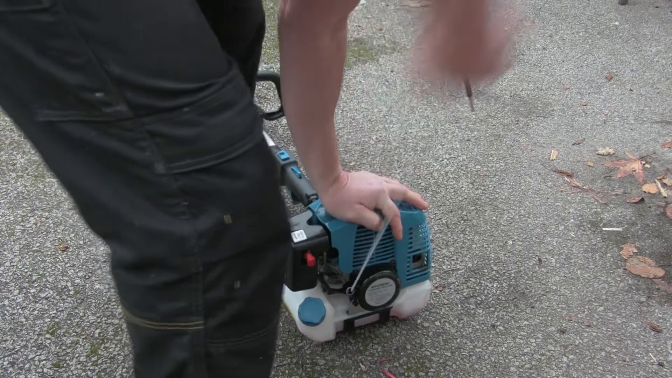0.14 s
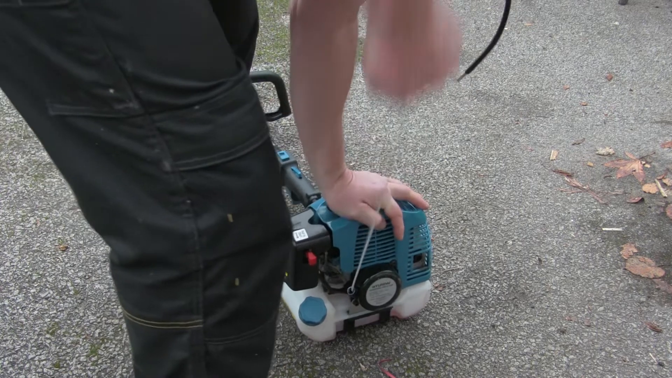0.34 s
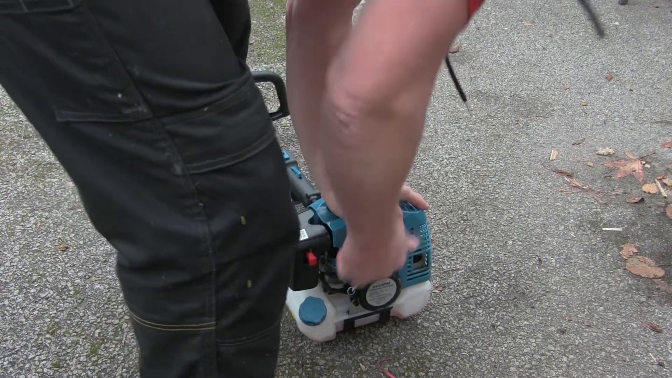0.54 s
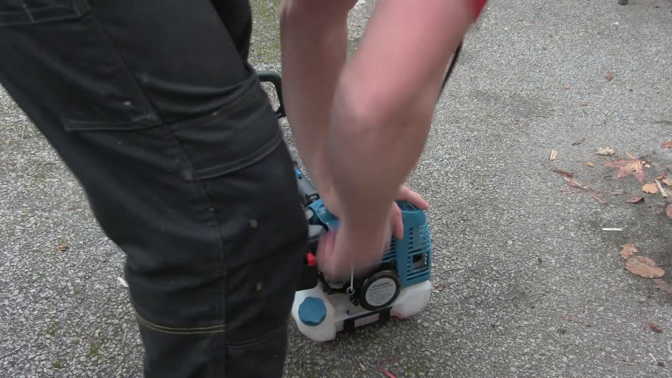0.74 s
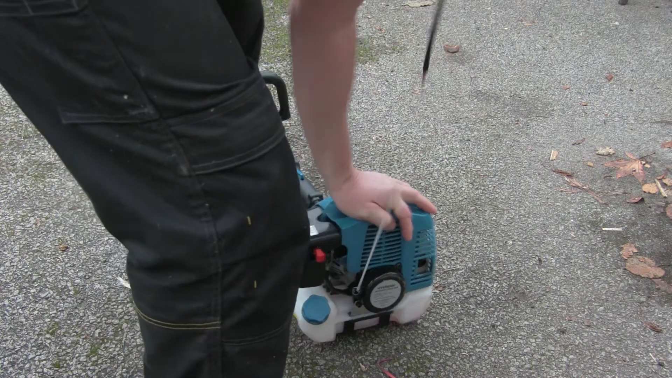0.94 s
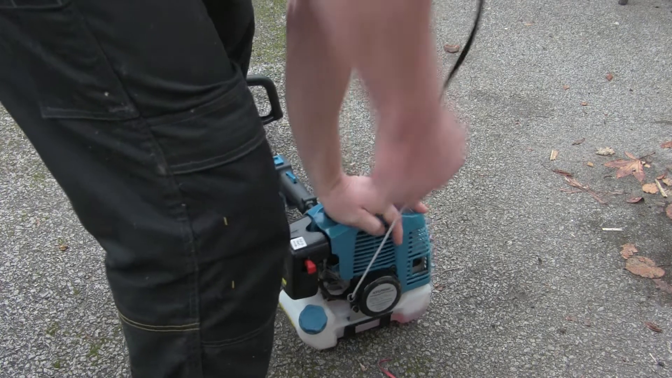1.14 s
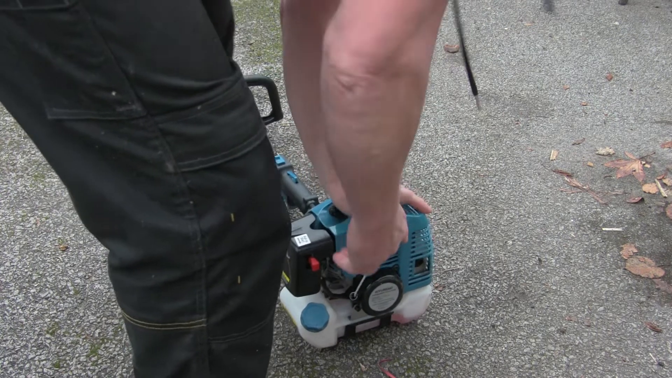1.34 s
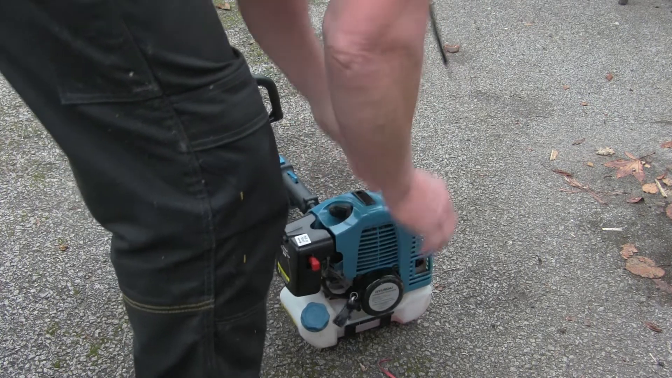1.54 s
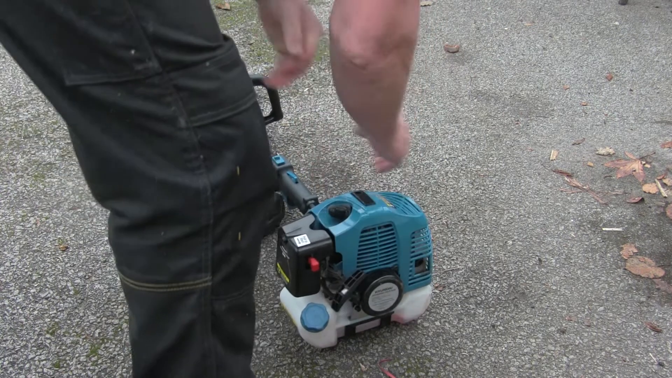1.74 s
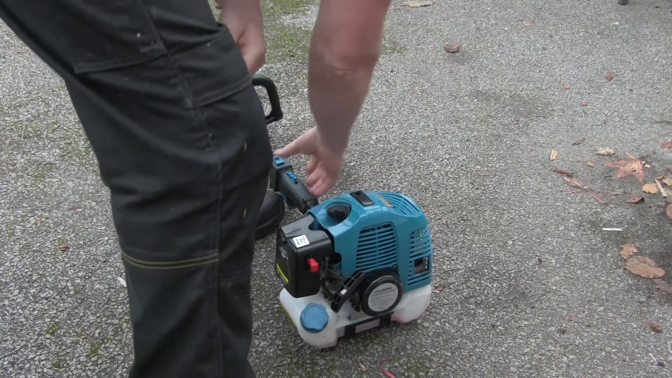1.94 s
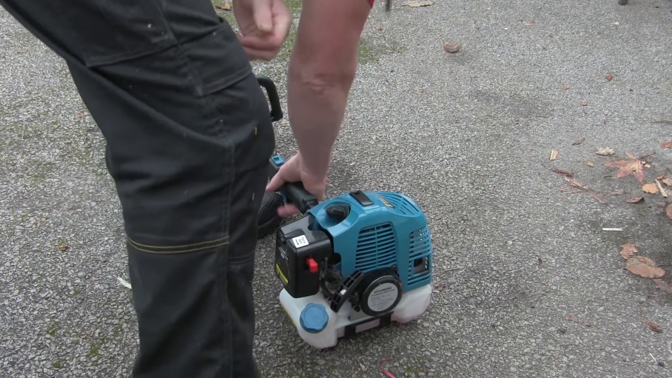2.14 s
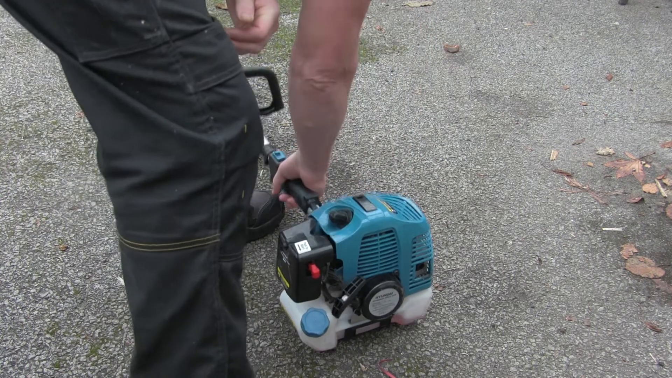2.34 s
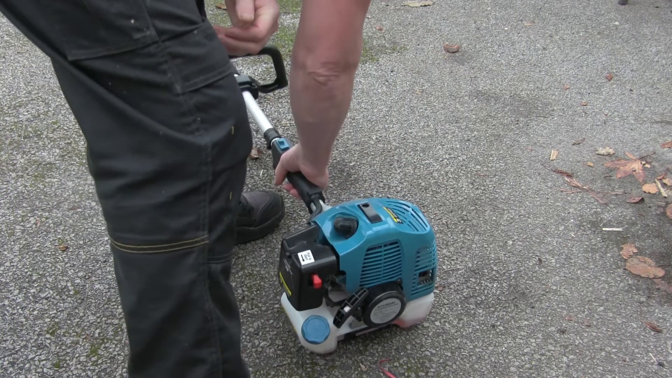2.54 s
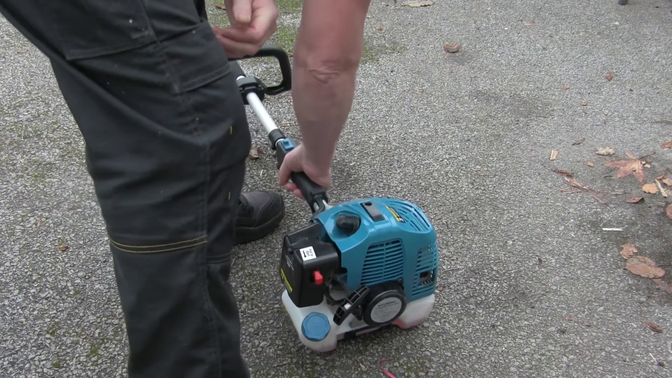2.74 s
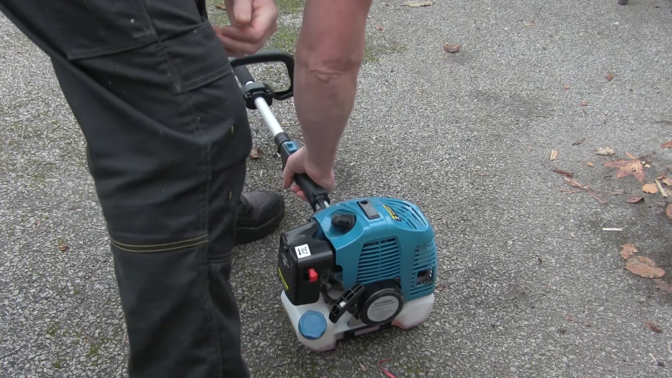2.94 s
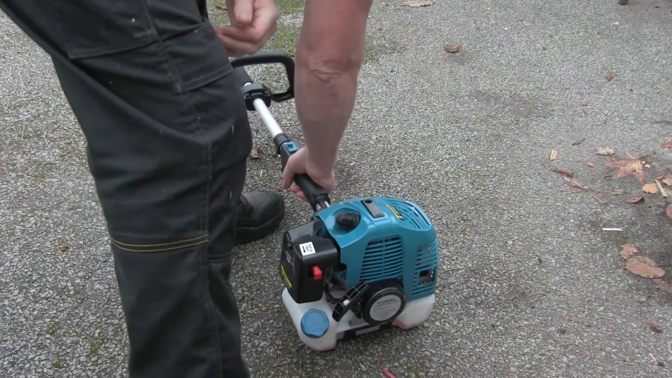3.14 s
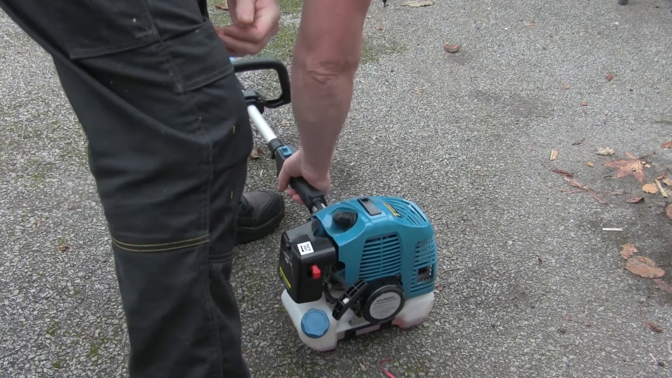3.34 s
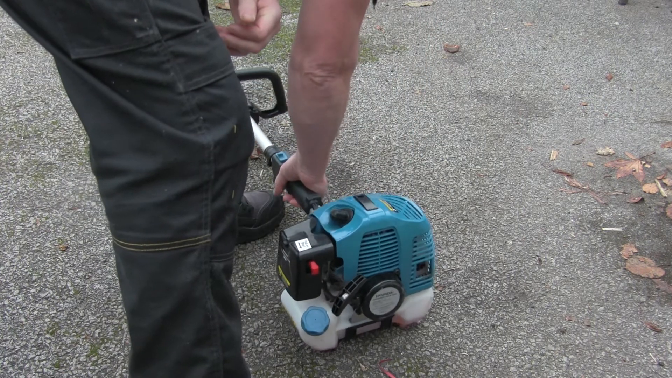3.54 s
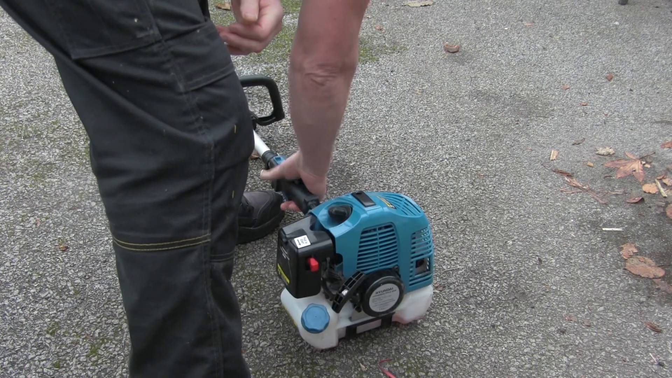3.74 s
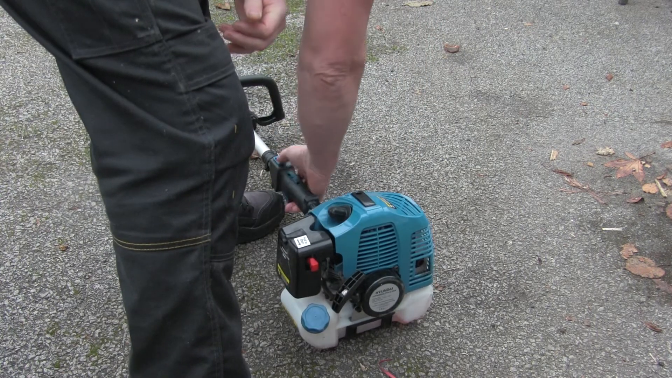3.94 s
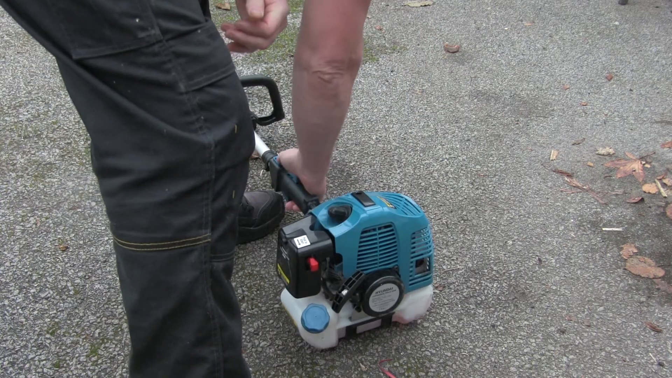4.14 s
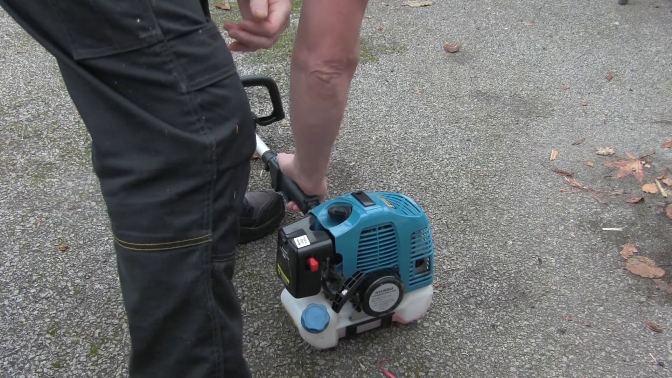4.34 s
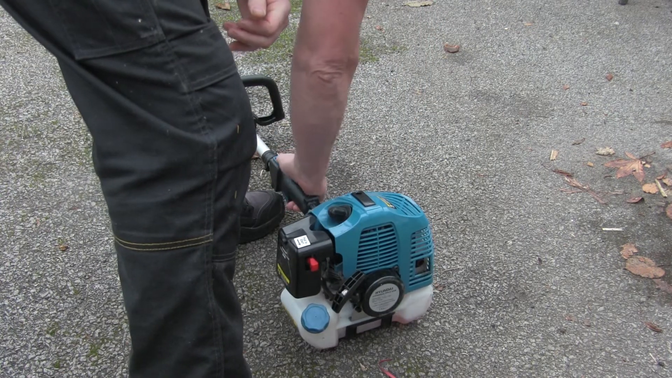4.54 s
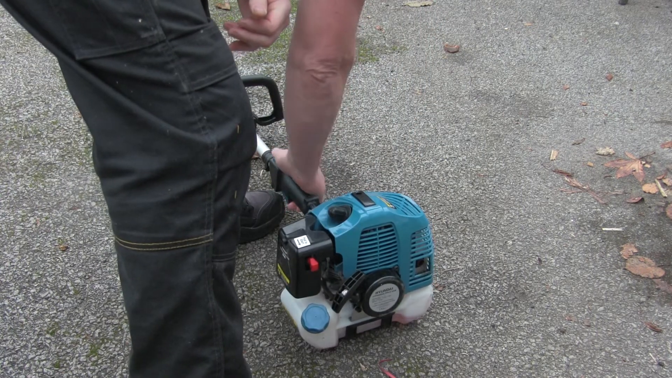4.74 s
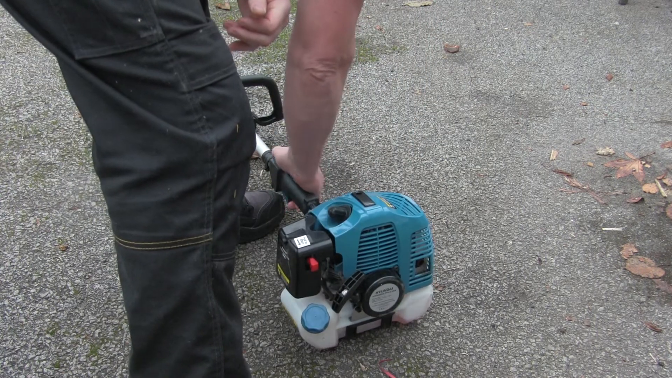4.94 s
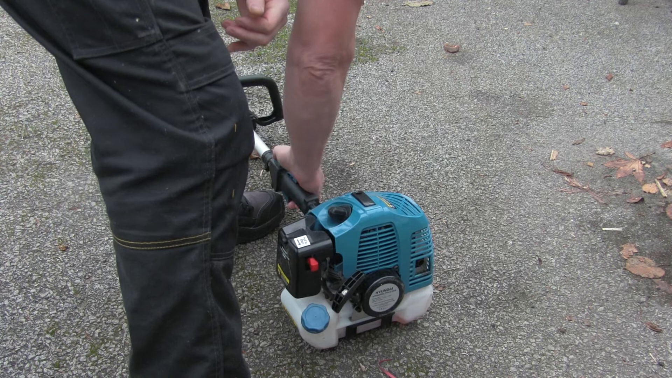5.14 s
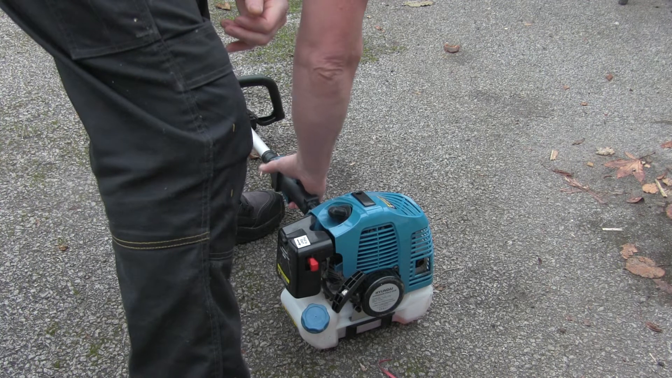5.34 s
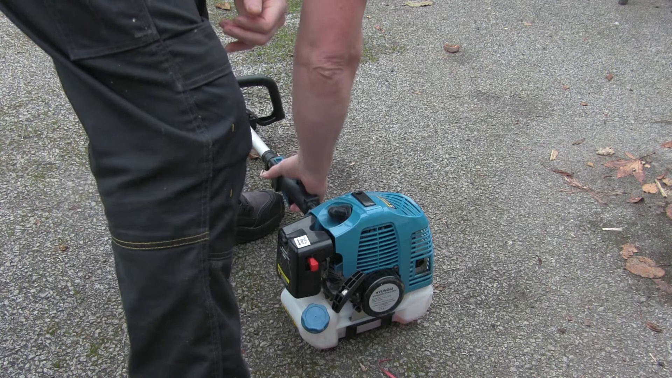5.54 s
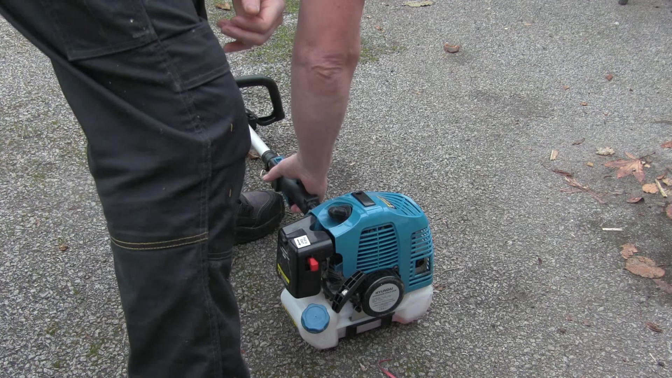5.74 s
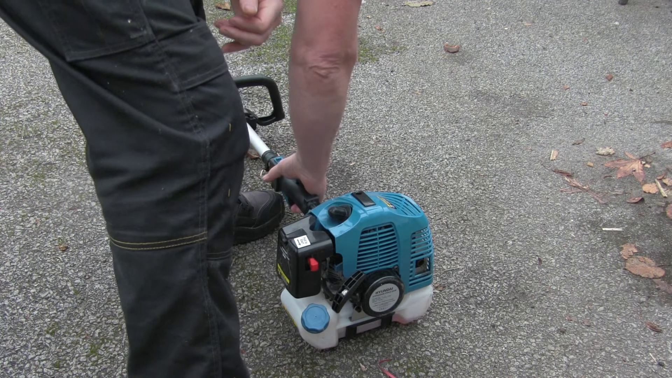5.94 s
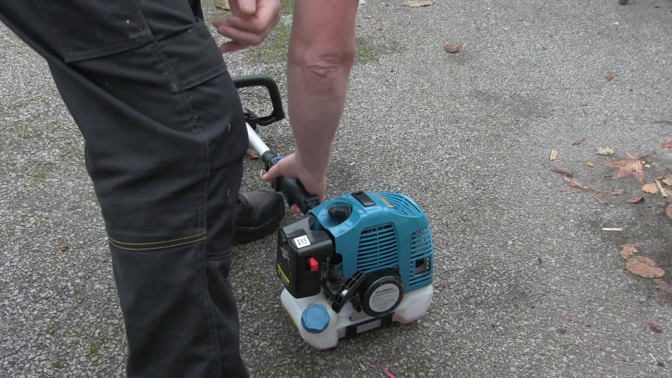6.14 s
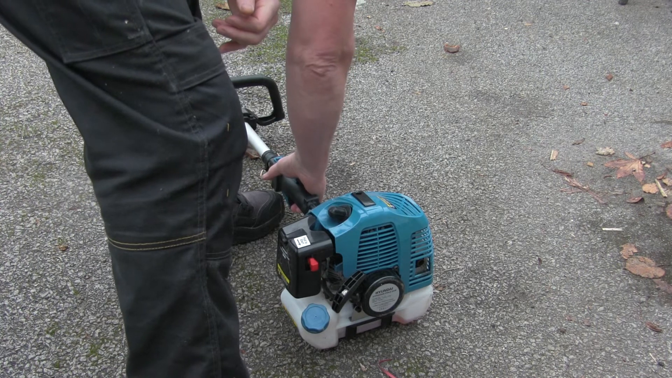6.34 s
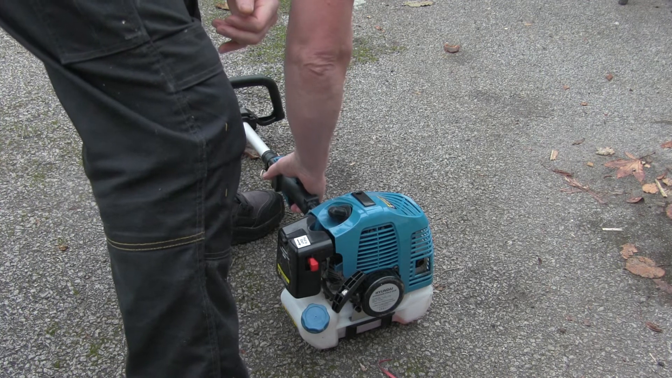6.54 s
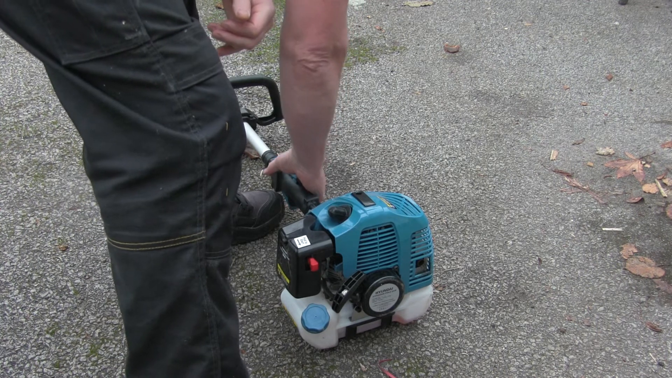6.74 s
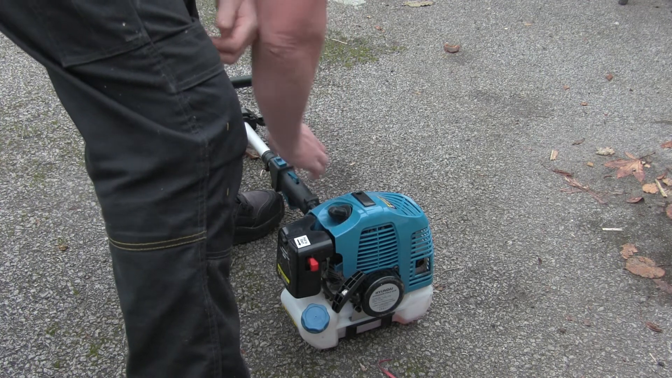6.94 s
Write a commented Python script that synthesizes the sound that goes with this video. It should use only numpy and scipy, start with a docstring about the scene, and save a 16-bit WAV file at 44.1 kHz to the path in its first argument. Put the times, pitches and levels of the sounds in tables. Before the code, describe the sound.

Two rasping, clattering pulls on a brush cutter's starter cord fail to fire the engine, followed by handle knocks and sharp control clicks.

```python
"""Two rasping, clattering pulls on a brush cutter's recoil starter; the small petrol engine does not fire.
In each pull the cord rasps, the cylinder puffs and the crank clatters; then the cord rewinds while pawls
snap over a ringing steel cup. The handle knocks home and a hand works the controls on the shaft.
Far traffic hums around the paved yard throughout, with a faint bird near the end."""
import sys
import numpy as np
from scipy import signal
from scipy.fft import rfft, irfft, next_fast_len
from scipy.io import wavfile
from scipy.ndimage import map_coordinates

SR = 44100
rng = np.random.default_rng(int(sys.argv[2]) if len(sys.argv) > 2 else 0)


def inscribe(sig):
    """Save sig as 16-bit PCM at rate SR to the path in sys.argv[1].

    A 1-D sig is mono; a 2-D sig holds one channel per row.
    Samples are clipped to [-1, 1] before scaling.
    """
    pcm = np.round(np.clip(np.atleast_2d(sig).T, -1, 1) * 32767)
    wavfile.write(sys.argv[1], SR, pcm.astype(np.int16))


N = 309141

# The two pulls. Each row: first compression in seconds, arm stop in seconds.
PULLS = [(.1663, .335), (.902, 1.112)]
# Crank speed, one list per pull. Each row: time in seconds, turns per second.
CRANK_SPEED = [
    [(0, .5), (.08, 6), (.1663, 28.66), (.24, 30.25), (.298, 13.56), (.43, 13.15), (.46, 1)],
    [(.8, 5), (.902, 29.6), (.9636, 32.2), (1.031, 20.15), (1.12, 14.2), (1.19, 10.5), (1.22, 1)],
]
# Reel speed, one list per rewind, quick until the hand holds the cord back.
# Each row: time in seconds, teeth per second.
REEL_SPEED = [
    [(.39, 64.1), (.426, 66.55), (.463, 89.3), (.495, 39.1), (.563, 30), (.6, 19.3), (.67, 12)],
    [(1.157, 60.2), (1.2067, 73.4), (1.2586, 62.3), (1.268, 29.6), (1.348, 18.5), (1.42, 13.1), (1.49, 3)],
]
# Upper modes of the steel starter cup. Each row: frequency in Hz, level in dB, t60 in seconds.
CUP_UPPER_MODES = [(9010, -1.5, 0.062), (9080, -2, 0.057), (11500, -12.5, .11), (14761, -25.5, .1),
                   (15515, -15, .08)]
CRANK_FULL_TURNS_PER_S, REEL_FULL_TEETH_PER_S = 30, 68


def amp(db):
    """Decibels to gain."""
    return 10 ** (np.asarray(db) / 20)


def unit(x):
    """Scale to rms 1."""
    return x / np.sqrt(np.mean(np.abs(x) ** 2) + 1e-20)


def along(points, hz):
    """Read (Hz, value) points on a log axis."""
    f, v = np.transpose(points)
    return np.interp(np.log(hz + 1), np.log(f), v)


def curve(points, outside=None):
    """Read (seconds, value) points at every sample."""
    times_s, values = np.transpose(points)
    return np.interp(np.arange(N) / SR, times_s, values, outside, outside)


def wobble(knots_per_s):
    """Smooth random curve."""
    knots = rng.standard_normal(int(N * knots_per_s / SR) + 4)
    return map_coordinates(knots, [np.arange(N) * knots_per_s / SR])


def filtered(x, response):
    """Apply a complex frequency response."""
    size = next_fast_len(N + SR // 2)
    return irfft(rfft(x, size) * response(np.fft.rfftfreq(size, 1 / SR)), size)[..., :N]


def add(track, start_s, sound):
    """Mix a sound into a track."""
    start = max(round(start_s * SR), 0)
    track[start:start + len(sound)] += sound[:N - start]


def noise(spectrum):
    """Coloured noise of rms 1."""
    return unit(filtered(rng.standard_normal(N), lambda hz: amp(along(spectrum, hz))))


def resonances(hz, modes):
    """Complex response of (Hz, width in Hz, dB) modes."""
    return sum(amp(db) * 1j * hz * w / (f * f - hz * hz + 1j * hz * w) for f, w, db in modes)


def octaves(speed, full):
    """Doublings of speed relative to full; far below zero at rest."""
    return np.log2(speed / full + 1e-9)


def passes(speed_points, first_s):
    """Time and speed of each whole turn or tooth from first_s on."""
    speed = curve(speed_points, outside=0)
    turns = np.cumsum(speed) / SR
    turns -= turns[round(first_s * SR)]
    at = np.searchsorted(turns, np.arange(turns[-1]), "right")
    return at / SR, speed[at]


def housing(hz, direct):
    """Resonances of engine cover and crankcase, plus the direct sound."""
    # Each row: frequency in Hz, width in Hz, gain in dB.
    modes = [(339.3, 60, -15.5), (525.3, 49, 4), (870, 500, -5), (1060, 40, -3), (1524, 69, -2.5),
             (2010, 140, -13), (2640, 140, -9.5), (2910, 60, -5.5), (3158, 67, -5.5), (3755, 400, -6),
             (5170, 62, -3.5), (5520, 150, -8), (7600, 130, -23.5), (11880, 400, -8)]
    return direct + resonances(hz, modes)


def ring(modes, scatter_db, drift):
    """One strike on a set of modes; loose contact makes the phase drift (turns per root second)."""
    t = np.arange(SR // 2) / SR
    out = np.zeros(len(t))
    for hz, db, t60_s in modes:
        envelope = amp(db + scatter_db * rng.normal() - 60 * t / t60_s)
        phase = rng.random() + drift * np.cumsum(rng.standard_normal(len(t))) / np.sqrt(SR)
        out += envelope * np.sin(2 * np.pi * (hz * t + phase))
    return out


def blows(rows, colour, mid_low_high_db, treble_tilt, rise_s, crack_t60_s, tail_db, tail_t60_s):
    """Hard contacts (seconds, dB, brightness in dB): a crack and a noise tail for the dense modes."""
    t = np.arange(SR // 4) / SR
    decay = amp(-60 * t / crack_t60_s) + amp(tail_db - 60 * t / tail_t60_s)
    envelope = (1 - np.exp(-t / rise_s)) * decay
    bands_hz = [(1500, 6000), (20, 1500), (6000, 16000)]
    tilts = (0, -1, treble_tilt)  # bright contacts trade thud for treble
    out = np.zeros(N)
    for (lo, hi), band_db, tilt in zip(bands_hz, mid_low_high_db, tilts):
        def band_colour(hz):
            response = colour(hz)
            return response / np.sqrt(np.mean(np.abs(response) ** 2 * ((hz > lo) & (hz < hi))))

        drive = np.zeros(N)
        for s, db, bright_db in rows:
            add(drive, s, amp(db + band_db + tilt * bright_db) * envelope * rng.standard_normal(len(t)))
        bandpass = signal.butter(3, (lo, hi), "band", fs=SR, output="sos")
        out += filtered(signal.sosfilt(bandpass, drive), band_colour)
    return out


def traffic(flutter_db=0.79):
    """Far tyres and engines: nearly mono in the bass, wide above."""
    # Each row: frequency in Hz, relative level in dB.
    spectrum = [(15, -51.5), (25, -20.5), (82, -4), (149, -1), (175, -0.5), (326, -1.5), (416, -3.5),
                (463, -2.5), (503, -2), (591, -1.5), (962, 0.5), (1790, -8), (3250, -25.5), (13600, -40.5),
                (16000, -40.5)]
    # Each row: time in seconds, level in dB.
    flow = [(0, -36.5), (2, -36.5), (3.2, -39), (4.2, -38.5), (5.6, -37.5), (7, -39)]
    # Each row: frequency in Hz, left-right correlation.
    correlation = [(60, 0.96), (150, 0.93), (380, 0.78), (950, 0.4), (2380, 0.26), (5980, 0.21),
                   (15000, 0.5)]

    def mid_side_gains(hz):
        angle = np.arccos(np.clip(along(correlation, hz), -1, 1)) / 2
        return amp(along(spectrum, hz)) * [np.cos(angle), np.sin(angle)]

    mid, side = filtered(rng.standard_normal((2, N)), mid_side_gains)
    return amp(curve(flow) + flutter_db * wobble(12)) * unit(np.array([mid + side, mid - side]))


def bird():
    """A small, far bird: thin gliding whistles that swell and fade."""
    # Each row: start and length in seconds, start and end pitch in Hz, level in dB.
    chirps = [(5.34, 0.1, 5300, 4650, -65), (5.979, 0.068, 6100, 6350, -62)]
    out = np.zeros(N)
    for s, length_s, start_hz, end_hz, db in chirps:
        hz = np.linspace(start_hz, end_hz, round(length_s * SR))
        add(out, s, amp(db) * np.hanning(len(hz)) * np.sin(2 * np.pi * np.cumsum(hz) / SR))
    return out


def yard(x):
    """Ground and nearby walls scatter a short tail, different at each ear."""
    # Each row: frequency in Hz, t60 in seconds.
    decay_times = [(200, .18), (2000, 0.12), (6000, 0.16), (14000, 0.024)]
    hz, t, spectra = signal.stft(rng.standard_normal((2, SR // 2)), SR, nperseg=256)
    decay = amp(-60 * t / along(decay_times, hz)[:, None])
    tail = signal.istft(spectra * decay, SR, nperseg=256)[1]
    return signal.fftconvolve(x[None], tail / np.linalg.norm(tail[0]), axes=1)[:, :N]


def cloth(flutter_db=1.484):
    """Sleeve and trousers brush softly as the arm moves to the shaft."""
    # Each row: midpoint and length in seconds, level in dB.
    brushes = [(1.672, .4, -63), (2.092, .46, -53.5), (2.349, .06, -45.5)]
    # Each row: frequency in Hz, relative level in dB.
    fabric_spectrum = [(1000, -22.5), (2500, 9), (8000, 0), (13000, -7), (16000, -8.5)]
    pressure = np.zeros(N)
    for middle_s, length_s, db in brushes:
        add(pressure, middle_s - length_s / 2, amp(db) * np.hanning(round(length_s * SR)))
    return pressure * amp(flutter_db * wobble(60)) * noise(fabric_spectrum)


def controls():
    """Switch and trigger snap in the grip; hard snaps set the aluminium shaft tube ringing."""
    # Each row: start in seconds, level in dB, brightness in dB.
    clicks = [(2.083, -38.5, 3), (2.202, -35, -7), (2.334, -33.5, 0), (2.503, -36.5, 4.5),
              (2.5758, -18.5, -4), (2.5807, -3, 5), (3.6712, -37.5, 4.5), (3.691, -16, -4),
              (3.699, -16, -3.5), (3.722, -23, 0), (3.7617, -20.5, -5), (3.770, -19, -7.5),
              (4.2145, -39.5, -4), (4.2787, -20, -4.5), (4.3094, -33, 5.5), (4.629, -41, 4),
              (4.974, -30, -5.5), (4.985, -32.5, -3)]
    # Each row: frequency in Hz, relative level in dB.
    grip_spectrum = [(120, -39), (200, -3), (509, 0), (683, -3), (1530, 1), (1910, -3.5), (2700, -4),
                     (7410, -10.5), (9060, -9), (16000, -23)]
    # Each row: frequency in Hz, level in dB, t60 in seconds.
    shaft_modes = [(497, 2, .1), (1080, 9, .04), (1550, 4, .15), (2627, 0, .18), (3009, -13, .25),
                   (4054, -10, .42), (4140, -15, .2), (4985, -16, .29)]
    colour = lambda hz: amp(along(grip_spectrum, hz))
    out = blows(clicks, colour, mid_low_high_db=(-4.8, -10, -8), treble_tilt=0.5,
                rise_s=0.00049, crack_t60_s=0.018, tail_db=-16.5, tail_t60_s=0.18)
    for s, db, _ in clicks:
        add(out, s, amp(1.5 * db - 21.5) * ring(shaft_modes, scatter_db=-1, drift=0.22))
    return out


def handle():
    """The starter snatches, its plastic handle strikes the cover, and hollow parts boom briefly."""
    # Each row: start in seconds, level in dB, brightness in dB.
    knocks = [(.6498, -8, -5.5), (.6868, -20, -5.5), (.8003, -4, 8.5), (1.4818, -15.5, 6.5),
              (1.51, -4.5, 7.5), (1.5342, -7.5, -2.5), (1.5519, -7.5, 0.5), (1.5622, -10, -0.5),
              (1.5803, -19, 1), (1.6002, -11, -9), (1.6622, -21, -0.5), (1.841, -33.5, -3.5)]
    # Each row: frequency in Hz, relative level in dB.
    plastic_spectrum = [(120, -57), (200, -14), (340, -6.5), (623, -2), (851, -3.5), (1840, 4), (2090, 5.5),
                        (2470, 0), (3690, 2), (7540, -18.5), (16000, -27)]
    # Each row: start in seconds, level in dB, frequency in Hz, t60 in seconds.
    booms = [(1.514, -10, 905, 0.055), (1.532, -8, 796, 0.039), (1.604, -9.5, 1160, 0.054),
             (1.605, -3.5, 340, 0.031), (3.70, -27.5, 201.4, 0.3)]
    colour = lambda hz: amp(along(plastic_spectrum, hz)) * housing(hz, direct=0.94)
    out = blows(knocks, colour, mid_low_high_db=(-4.5, -8, -13), treble_tilt=0.76,
                rise_s=0.00077, crack_t60_s=0.021, tail_db=-12.5, tail_t60_s=0.13)
    t = np.arange(SR // 4) / SR
    for s, db, hz, t60_s in booms:
        envelope = amp(db - 60 * t / t60_s) * (1 - np.exp(-t * hz))
        add(out, s, envelope * np.sin(2 * np.pi * hz * t))
    return out


def cord(rasp_db=-26.5, drone_db=-29, rewind_db=-27.5, grain_db=2.5):
    """The braided cord rasps through its guide, out and back; the spinning crank makes the cover drone."""
    # Each row of both: frequency in Hz, relative level in dB.
    rasp_spectrum = [(350, -36), (600, -5), (957, -6), (1830, -3.5), (2990, -7), (7020, -14), (7620, -10.5),
                     (8500, -14), (13600, -22), (16000, -38)]
    drone_spectrum = [(29, -55), (50, -25.5), (189, 1.5), (338, -7.5), (457, -0.5), (529, -2), (611, -9),
                      (900, -6), (1170, -38), (1980, -120)]
    pull_db_per_oct, rewind_db_per_oct = 4.5, 7.5
    swell_db_per_s, release_db_per_s = 18.5, 259  # as cord runs out; once the arm stops
    t = np.arange(N) / SR
    rasp_gain, drone_gain = np.zeros(N), np.zeros(N)
    for (first_s, stop_s), speeds in zip(PULLS, CRANK_SPEED):
        speed_oct = octaves(curve(speeds, outside=0), CRANK_FULL_TURNS_PER_S)
        effort_db = pull_db_per_oct * speed_oct - release_db_per_s * np.maximum(t - stop_s, 0)
        rasp_gain += amp(rasp_db + effort_db + swell_db_per_s * (t - first_s))
        drone_gain += amp(drone_db + effort_db)
    for speeds in REEL_SPEED:
        speed_oct = octaves(curve(speeds, outside=0), REEL_FULL_TEETH_PER_S)
        rasp_gain += amp(rewind_db + rewind_db_per_oct * speed_oct)
    fibres = rng.standard_normal(N) * amp(grain_db * wobble(600))
    rasp = unit(filtered(fibres, lambda hz: amp(along(rasp_spectrum, hz)) * housing(hz, direct=0.95)))
    return rasp_gain * rasp + drone_gain * noise(drone_spectrum)


def ratchet(snap_db=-4.5, snap_db_per_oct=5, lower_db=-19, upper_db=-13.5, ring_db_per_oct=9.5):
    """On rewind the pawls snap over the starter cup's teeth, harder with speed, and ring the cup."""
    # Each row: frequency in Hz, relative level in dB.
    pawl_spectrum = [(150, -20.5), (500, -4), (1500, 1), (3500, 4.5), (4700, -1.5), (5500, 0), (8500, -5),
                     (10000, -17), (12500, -11.5), (16000, -24)]
    # Each row: frequency in Hz, level in dB, t60 in seconds.
    cup_lower_modes = [(3720, -6, .1), (3990, -4.5, 0.17), (6360, -0.5, 0.13), (6270, -4.5, 0.13)]
    engage_db, engage_s = -9, 0.0073  # snaps start soft and dull while the pawls engage
    build_db, build_s = -11.5, 0.022  # the ring builds from a weak start
    snaps, cup = [], np.zeros(N)
    for speeds in REEL_SPEED:
        start_s = speeds[0][0]
        for s, speed in zip(*passes(speeds, start_s)):
            speed_oct = min(octaves(speed, REEL_FULL_TEETH_PER_S), 0)
            soft_db = engage_db * np.exp((start_s - s) / engage_s)
            snaps.append((s, snap_db + snap_db_per_oct * speed_oct + soft_db, soft_db))
            lower = amp(lower_db) * ring(cup_lower_modes, scatter_db=3.5, drift=2.6)
            upper = amp(upper_db) * ring(CUP_UPPER_MODES, scatter_db=3, drift=2.2)
            ring_db = ring_db_per_oct * speed_oct + build_db * np.exp((start_s - s) / build_s)
            add(cup, s + 0.001, amp(ring_db) * (lower + upper))
    colour = lambda hz: amp(along(pawl_spectrum, hz)) * housing(hz, direct=0.53)
    return cup + blows(snaps, colour, mid_low_high_db=(-7.5, -19, -15.5), treble_tilt=0.47,
                       rise_s=0.0005, crack_t60_s=0.026, tail_db=-13, tail_t60_s=0.13)


def crank(rattle_gap_s=0.007, rattle_loss_db=1):
    """Compression checks the crank; the slack in the starter clatters and faintly rings its cup."""
    # Each row: start in seconds, level in dB, brightness in dB, number of contacts.
    jolts = [(.1173, -15, -7.5, 2), (.159, -17.5, -9, 1), (.1686, -12, -7, 1), (.199, -15.5, -8.5, 1),
             (.2434, -3, 0, 4), (.3003, -10, 6, 1), (.3237, -7, -1, 2), (.9713, -4, -1.5, 2),
             (1.0285, -7, 7, 1), (1.0745, -7, 13, 1), (1.0945, -2, 3, 1)]
    # Each row: frequency in Hz, relative level in dB.
    metal_spectrum = [(240, -24.5), (400, -10.5), (553, -3.5), (879, -11), (964, -3.5), (2510, -2),
                      (3690, -1), (7170, -11), (9180, -13.5), (9920, -17.5), (16000, -23.5)]
    contacts = [(s + k * rattle_gap_s, db - k * rattle_loss_db, bright_db)
                for s, db, bright_db, count in jolts for k in range(count)]
    colour = lambda hz: amp(along(metal_spectrum, hz)) * housing(hz, direct=0.45)
    out = blows(contacts, colour, mid_low_high_db=(-8, -13, -14), treble_tilt=0.15,
                rise_s=0.00037, crack_t60_s=0.03, tail_db=-9, tail_t60_s=0.1094)
    for s, db, bright_db in contacts:
        add(out, s, amp(db + 0.4 * bright_db - 22.5) * ring(CUP_UPPER_MODES, scatter_db=7, drift=2.4))
    return out


def cylinder(puff_db=-6, db_per_oct=2.5, sag_db_per_s=32, width_s=0.00086):
    """Each turn pushes out one short puff, which echoes back off the ground and nearby wall and rings its
    chambers."""
    # Air box and silencer. Each row: frequency in Hz, width in Hz, gain in dB.
    chamber_modes = [(186, 37.7, -5.5), (325, 10, -3.5)]
    t = np.arange(-SR // 100, SR // 30) / SR

    def puff(delay_s):
        x = (t - delay_s) / width_s
        return (1 - x ** 2) * np.exp(-0.5 * x ** 2)

    out = np.zeros(N)
    for (first_s, _), speeds in zip(PULLS, CRANK_SPEED):
        for s, speed in zip(*passes(speeds, first_s)):
            spent_db = sag_db_per_s * (s - first_s)
            db = puff_db + db_per_oct * octaves(speed, CRANK_FULL_TURNS_PER_S) - spent_db
            rebound_s = 0.0054 * (1 + 0.031 * rng.normal())
            add(out, s + t[0], amp(db) * (puff(0) + 0.54 * puff(rebound_s) + 0.1093 * puff(0.0102)))
    return filtered(out, lambda hz: 1 + resonances(hz, chamber_modes))


def scene():
    """The machine lies just right of centre, an arm's length or two away."""
    puffs = cylinder()
    machine = cord() + crank() + ratchet() + handle() + controls() + cloth()
    direct = (machine + puffs) * amp([[-0.5], [0.5]])
    scattered = yard(amp(-10) * machine + amp(-13) * puffs + bird())
    return direct + scattered + traffic()


def record(dry):
    """Thin the deepest bass, round off the highest peaks and limit the band."""
    low_cut_hz, top_hz = 38, 15900
    thinned = signal.sosfilt(signal.butter(2, low_cut_hz, "high", fs=SR, output="sos"), dry)
    rounded = thinned / (1 + np.abs(thinned) ** 6) ** (1 / 6)
    return filtered(rounded, lambda hz: hz < top_hz)


dry = scene()
out = record(dry)
inscribe(out)
```